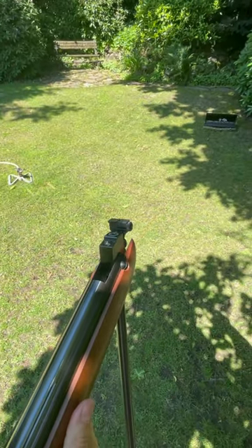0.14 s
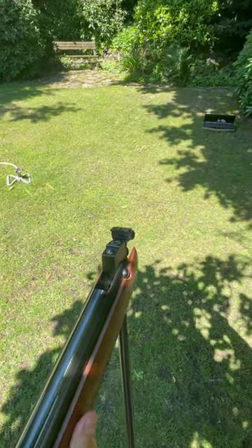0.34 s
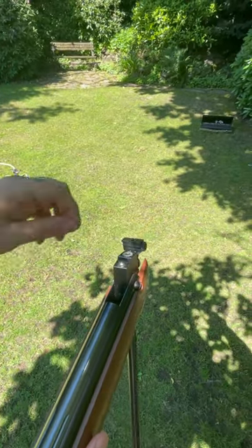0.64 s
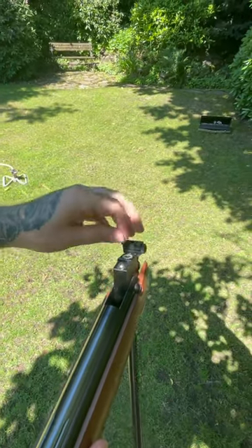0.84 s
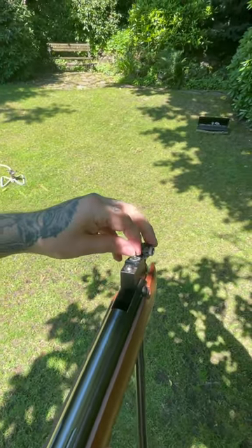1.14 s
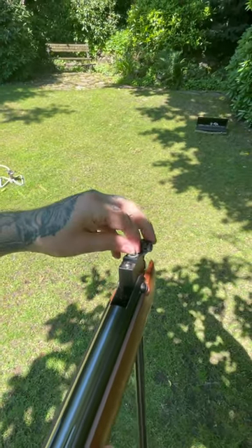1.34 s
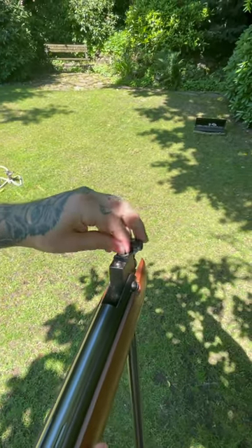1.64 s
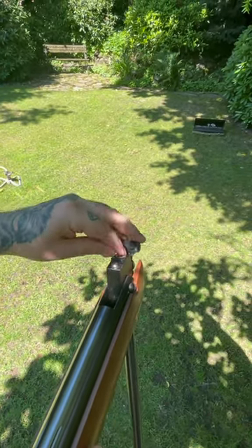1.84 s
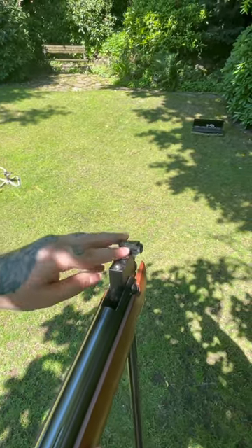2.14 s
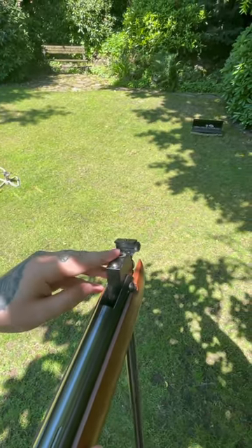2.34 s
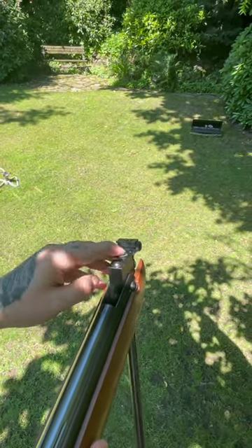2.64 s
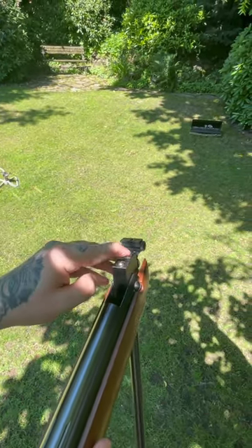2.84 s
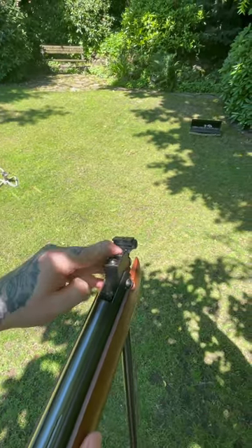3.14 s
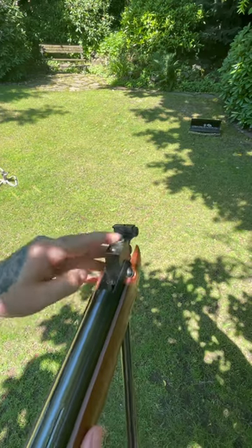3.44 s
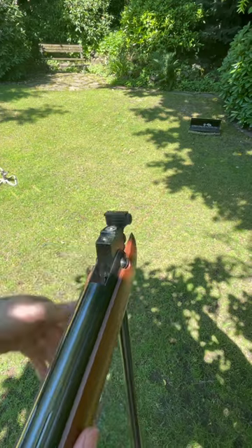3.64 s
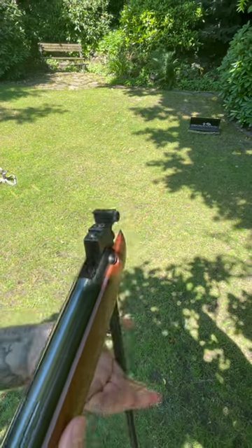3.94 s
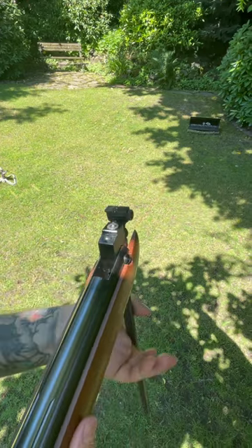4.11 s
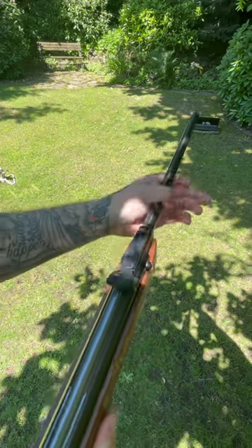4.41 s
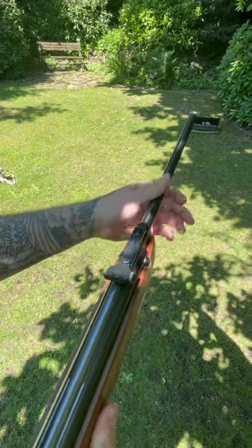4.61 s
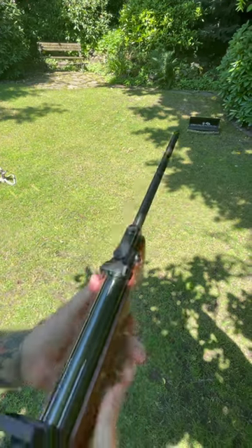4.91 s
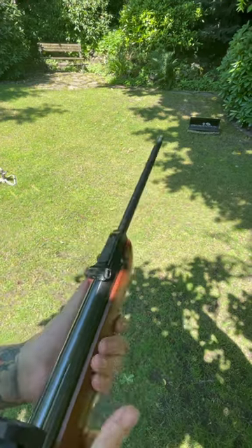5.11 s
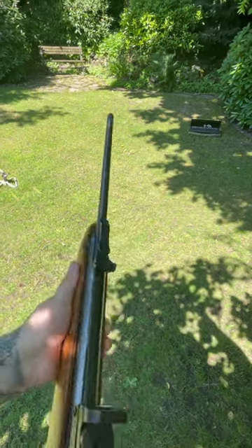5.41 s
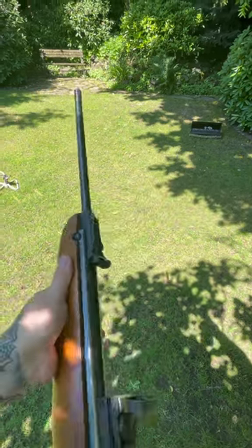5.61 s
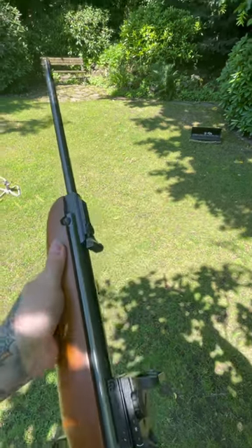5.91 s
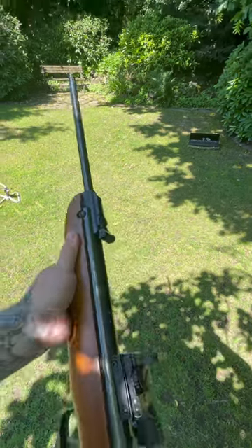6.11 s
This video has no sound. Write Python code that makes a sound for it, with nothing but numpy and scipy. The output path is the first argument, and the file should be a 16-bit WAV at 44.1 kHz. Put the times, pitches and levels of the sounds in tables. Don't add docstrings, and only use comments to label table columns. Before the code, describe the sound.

Soft birdsong and faint breeze, then a quick metal scrape, two sharp ringing cracks with a wooden thump, light handling ticks and a crisp loud click.

```python
import sys
import numpy as np
from scipy import signal
from scipy.fft import rfft, irfft, next_fast_len
from scipy.io import wavfile
from scipy.ndimage import uniform_filter1d

SR = 44100
rng = np.random.default_rng(int(sys.argv[2]) if len(sys.argv) > 2 else 0)


def wav_out(sig):
    wavfile.write(sys.argv[1], SR, np.round(np.clip(np.atleast_2d(sig).T, -1, 1) * 32767).astype(np.int16))


def magnitude_from_level(level_db):
    exponent = np.asarray(level_db, float) / 20
    return 10 ** exponent


N = 276065
T = np.arange(N) / SR

# (time [s], length [s], start [Hz], reached [Hz], level [dB])
ENGINES = [
    (.2, 0.93, 50.2, 53.3, -56.5),
    (4.02, 0.85, 71.13, 85.5, -54.5),
    (4.55, 1.14, 53.4, 67.32, -49.5),
    (4.85, 0.268, 93.2, 100.8, -59),
    (5.15, 0.54, 68.16, 87.35, -53),
]
# (time [s], level [dB])
STIR = [(0.0, 1), (.3, 0.26), (1.9, 0.05), (2.5, -1), (3.55, -3), (3.7, -0.5), (4.69, -0.5), (5.33, 3.5),
        (5.8, 3), (5.94, 5.5), (6.26, 1)]
# (frequency [Hz], level per Hz [dB])
GARDEN_TONE = [(94, -36.5), (160, -6.5), (188, -3), (284, -2.5), (479, -8.5), (892, -8.5), (1200, -12.5),
               (1430, -15.5), (3650, -25.5), (6260, -33), (7200, -28), (10400, -83), (17600, -120)]
# (time [s], held [s], level [dB], build-up per 20 dB [s])
SLEEVES = [(.25, 0.27, -90.5, 0.5), (3.95, .04, -92, -4), (4.04, .14, -83.5, -0.4), (4.34, 0.025, -81, 1.2),
           (5.47, .06, -84, -1.5), (5.6, 0.047, -89, 2), (4.79, 0.017, -72, -0.66),
           (5.09, 0.18, -70, -0.14), (5.35, 0.025, -74, 0.6), (5.551, 0.025, -84, 0.8),
           (5.891, 0.093, -73, 0.18), (6.24, 0.043, -81, -0.1)]
# (time [s], rumble [dB], eddies [dB], sink per 20 dB [s])
GUSTS = [(.04, -50.5, -53, 0.13), (.8, -62.5, -93, 3.5), (1.38, -47, -64, 0.17), (1.48, -54, -48, 0.5),
         (1.659, -45, -45, 0.03), (2.06, -51, -46, 0.15), (2.391, -72, -59, 0.5), (2.639, -52.5, -52, 0.26),
         (2.929, -60, -47, 0.6), (3.12, -60.5, -54.5, -0.02), (3.4, -48.5, -48, 0.04),
         (3.628, -47.5, -43, -0.03), (4.049, -50, -45, 0.29), (5.2, -53, -68.5, 2.5),
         (6.149, -64.5, -59.5, 2)]

# (time [s], level [dB])
FLOCK = [(0, -81), (.15, -91), (.55, -81), (.85, -79), (1.9, -74.5), (2.15, -95), (2.6, -92), (3.55, -111),
         (3.68, -81), (4.1, -77.5), (4.74, -92), (4.8, -76.5), (5.35, -62.5), (5.7, -76.5), (5.85, -64),
         (6.26, -75.5)]
# (time [s], frequency [Hz], level [dB])
CHEEP_STROKES = [
    [(0, 6067, 17.5), (.015, 6297, 10), (.05, 6143, -9.5), (.09, 6130, -14)],
    [(0, 4884, 19.5), (.015, 5293, 8.5), (.05, 5010, -8.5), (.08, 5100, -3)],
    [(0, 4705, 2), (.02, 4330, -0.5), (.06, 4300, -19.5), (.09, 4274, -37)],
    [(0, 2101, -7), (.03, 2300, -12.5), (.09, 2170, -25.5)],
]
# (time [s], two upper strokes [dB], falling stroke [dB], deep stroke [dB], pitch factor)
CHEEPS = [(.575, -80.5, -98, -60, 0.91), (0.801, -74, -73, -57.5, 0.95), (1.034, -77.5, -68.5, -64.5, 0.99),
          (1.253, -71.5, -62.5, -67, 0.97), (1.47, -81, -75, -65, 0.91), (1.548, -75, -67, -64, 0.98),
          (1.631, -75.5, -67, -59, 0.97), (1.82, -75.5, -66, -80, 0.95), (3.645, -76.5, -73, -92, 0.97),
          (3.843, -79.5, -63.5, -71, 0.95), (4.78, -75, -68, -63, 1.07), (4.83, -74.5, -73, -82, 0.95),
          (5, -69, -75, -62, 0.99), (5.089, -73, -63, -83, 1.08), (5.301, -76, -73, -77, 1.04),
          (5.525, -68.5, -77.5, -71, 0.93), (5.79, -73, -61.5, -61, 1.05), (6.04, -68.5, -61, -86, 0.96)]
# (time from peak [s], frequency [Hz], level [dB])
CHIRP_STROKES = [
    [(-.035, 4514, -24), (-.022, 4650, -8.5), (-.017, 5594, -18)],
    [(-.018, 3399, -33), (-.013, 4103, -11), (-.003, 4241, -4.5), (.001, 5000, -1), (.005, 4491, -14)],
    [(.004, 3999, -6), (.018, 3752, -7.5), (.032, 3617, -5.5)],
    [(.052, 3200, -24), (.06, 3447.5, -8), (.066, 4036, -6), (.07, 3491, -15)],
    [(.068, 3500, 1), (.085, 3257, -13), (.12, 3103, -16)],
]
# (time [s], level [dB], pitch factor)
CHIRPS = [
    (0.44, -54, 1.03),
    (1.112, -54.5, 1.013),
    (1.721, -57.5, 0.99),
    (2.295, -54.5, 1.037),
    (3.639, -57, 1.01),
    (5.351, -52, 1.01),
]
# (time [s], length [s], start [Hz], reached [Hz], level [dB])
THRUSH_LOW = [
    (1.2, 0.16, 2024, 2200, -72),
    (1.6, 0.18, 1804, 1950, -70),
    (2.07, 0.182, 1866, 1895, -71.5),
    (2.19, 0.093, 1990, 2200, -71),
]
THRUSH_HIGH = [
    (1.817, 0.22, 2550, 2887, -66),
    (1.948, 0.13, 2900, 2800, -70.5),
    (2.46, 0.084, 2960, 2775, -69),
    (2.551, 0.119, 2715, 2867, -73.5),
]
THRUSH_FAINT = [(0.57, .17, 5250, 5200, -77), (2.6, .08, 3700, 3900, -80), (2.76, 0.14, 3050, 3150, -83),
                (2.85, 0.15, 3250, 3300, -84), (3.14, .05, 4400, 4650, -87), (3.61, .03, 5500, 6250, -80),
                (3.24, .05, 2250, 2330, -80), (3.3, .08, 5450, 5600, -91), (3.37, .06, 2000, 2050, -79),
                (3.455, .13, 2370, 2410, -77), (2.76, .1, 1800, 1800, -81), (.93, .16, 2300, 2350, -78)]
TRILLS = [
    (4.54, 0.0756, 2884, 3240, -68),
    (4.68, 0.055, 2954, 3430, -65),
]
SEEPS = [
    (5.975, 0.037, 8400, 8400, -73),
    (6.022, 0.023, 4850, 5150, -50),
    (6.11, 0.081, 7700, 8550, -57.5),
]
COOS = [
    (.12, 0.11, 460, 450, -61.5),
    (.84, 0.34, 555, 546, -66),
    (1.82, 0.25, 540, 536.4, -68),
    (2.13, 0.342, 531.6, 527.5, -65),
    (3.22, 0.13, 530, 538, -66),
]

# (time [s], frequency [Hz], peak [dB], t60 [s], rise [s])
KNOCKS = [
    (1.358, 73, -17.5, 0.035, 0.0074),
    (1.362, 157, -56, 0.12, 0.0077),
    (4.041, 119.7, -29, 0.061, 0.0068),
    (4.295, 200, -31.5, 0.089, 0.0013),
    (4.3321, 203, -19, 0.13, 0.0031),
    (4.33, 125, -16, 0.023, 0.0011),
]

# (frequency [Hz], left minus right [dB], left lead [rad])
PORT_DIFFERENCE = [(440, 4, 0), (880, -3, -1.1), (1540, -3.5, -1), (2400, 3, .7), (3500, -.5, .2),
                   (5900, 2, -1.5), (7200, 5, -2.4), (9000, 1, -3.8), (15000, 0, -7.4)]
# (time [s], peak [dB], bass under 1.5 kHz [dB], left minus right [dB])
SCRAPE = [(4.2016, -35, 0, -2), (4.2035, -19, -5, -1), (4.2095, -28, 1, 4), (4.2138, -22.5, -8, -1),
          (4.2164, -20, -3, -2), (4.223, -20, 2, 2.5), (4.2245, -32.5, 0, -2), (4.23, -24.5, -4.5, 3),
          (4.2344, -23.5, 5.5, -3.5), (4.2383, -17.5, -8, 3), (4.24, -22.5, -6, 5),
          (4.2472, -14.5, -12.5, 1.5), (4.2498, -23, 0.5, 0.5), (4.258, -20.5, -10, 5),
          (4.263, -21.5, -4, 0.5), (4.264, -24.5, 1.5, -1), (4.274, -36, 14.5, -6.5)]
# (time [s], peak [dB], treble over 7 kHz [dB], bass under 1.5 kHz [dB], left minus right [dB])
TICKS = [(0.0684, -57, -1, -5, 9), (1.7397, -55, 0, -11, 6), (2.2927, -58, -8, -2, 4),
         (2.5496, -63, 1, -14, -6), (4.515, -56, -2, -13, 0), (4.5532, -47, -6, -2.5, -3),
         (4.5937, -58, 1, -18, 5), (5.043, -42.5, -12, 1.5, 1), (5.093, -39, -15, 2.5, 4),
         (5.101, -33, -14, -9, -10), (5.246, -32.5, -28, -1.5, -4), (5.2705, -33.5, -9, -13, -4),
         (5.334, -32, -21, 2.5, -1), (5.341, -33, -31, -3, 3), (5.3485, -30.5, -34, -0.5, 3),
         (5.356, -31.5, -22, -1.5, 0), (5.5675, -25.5, -13, -14, -3), (5.9676, -33, -22, 1, -3),
         (5.991, -35, 4, -42, 5)]
# (time [s], peak [dB], treble over 7 kHz [dB], bass under 1.5 kHz [dB], contact [s])
GRIP = [
    (3.9923, -45, -7, 5.5, 0.0036),
    (4.009, -48.5, -18, 4.5, 0.0076),
    (4.0193, -28.5, -4.5, -6, .0015),
    (4.023, -42.5, -15.5, 2, 0.0025),
]
LATCH = [
    (4.2912, -1.5, 5, -3, 0.0019),
    (4.2936, -7, -2, 0, 0.0024),
    (4.2985, -25.5, -10, 0.5, 0.0039),
    (4.308, -35.5, -23.5, 12.5, 0.007),
]
LOCK = [
    (4.3241, -3, -1.5, -1.5, 0.0031),
    (4.3285, -20, -6, 5.5, 0.006),
]
CATCH = [
    (5.878, -40, -27, -20, 0.0054),
    (5.881, -30, -29, -24, 0.0048),
    (5.8857, 0.5, 2.5, -5.5, 0.0022),
    (5.8895, -20.5, -10.5, 6.5, 0.0058),
    (5.894, -30, 2.5, 12, 0.00065),
    (6.0057, -17.5, 5.5, -18, 0.003),
]
# (frequency [Hz], level per Hz [dB])
SCRAPE_TONE = [(180, -80), (300, -23), (863, -2), (2210, -12), (3530, -5), (5830, -2.5), (7200, -9.5),
               (8700, -15.5), (10900, -10.5), (13700, -20.5), (16500, -36.5)]
TICK_TONE = [(300, -39), (700, -21), (1500, -10), (4300, -1.5), (6000, 5), (14000, 2), (16500, -24)]
GRIP_TONE = [(300, -18), (750, -2), (1500, 1), (2400, -4), (3400, -7), (4600, 0), (5700, -16), (7200, -16),
             (8700, -9), (11500, -21), (16500, -32)]
LATCH_TONE = [(240, -38), (440, -10), (880, 5.5), (1540, -1.5), (2400, -8.5), (3500, 0), (4600, -4),
              (5900, 2), (7200, -7.5), (9000, -11.5), (10200, -6.5), (11800, -19.5), (14500, -23),
              (16500, -34)]
LOCK_TONE = [(290, -13), (440, -3), (880, 5), (1540, 5), (2200, -10), (2700, 0), (3500, -1), (4800, -4),
             (7000, -2.5), (8800, -9), (10200, -11.5), (11800, -16.5), (14500, -16.5), (16500, -39.5)]
CATCH_TONE = [(350, -48), (800, -43), (1200, 4.5), (2000, -11), (3500, 0.5), (4600, -5), (5300, -6.5),
              (6400, 1.5), (7300, -8.5), (8600, 1.5), (9700, -6), (10900, -4.5), (12000, -7), (14500, -17),
              (16500, -27)]
# (frequency [Hz], level [dB], t60 [s])
SCRAPE_MODES = [(843, 0, 0.096), (1840, -5, 0.057), (2430, -11.5, 0.075), (3800, 2, 0.047),
                (4850, -5, 0.038), (5660, -12, 0.019), (6400, -3, .03), (11330, -16.5, .02)]
TICK_MODES = [(810, -10.5, .027), (1425, -1, 0.032), (1940, -1.5, 0.063), (2426, -1, 0.048),
              (4474, -4, 0.026), (5450, -0.5, 0.046)]
LATCH_MODES = [(789, -1.5, 0.04), (1680, -8.5, 0.021), (2640, -13.5, 0.055), (4020, -3.5, 0.023),
               (4520, -18.5, 0.018), (5860, -27.5, 0.081), (10450, -25.5, 0.05)]
LOCK_MODES = [(780, -16, 0.04), (1770, -1, 0.04), (2800, -6, 0.061), (3900, -17.5, 0.041), (5200, -20, .08),
              (6550, -22.5, .08)]
CATCH_MODES = [(1267, 0, 0.067), (2200, -13, 0.077), (3320, -4, 0.052), (4760, -2, 0.044),
               (6000, -14, 0.076), (7700, -31, 0.027)]


def unit(x):
    return x / np.sqrt(np.mean(x ** 2))


def opposed(db):
    return magnitude_from_level(np.array([[db], [-db]]) / 2)


def decay(t, t60):
    return np.exp(-np.log(1000) * t / t60)


def colour(x, points):
    n = next_fast_len(x.shape[-1])
    hz = np.arange(n // 2 + 1) * SR / n
    f, db = np.transpose(points)
    gain = magnitude_from_level(np.interp(np.log(hz + 1), np.log(f), db))
    return irfft(rfft(x, n) * gain, n)[..., :x.shape[-1]]


def band(x, lo_hz, hi_hz, order=2):
    sos = signal.butter(order, [lo_hz, hi_hz], "bandpass", fs=SR, output="sos")
    return signal.sosfilt(sos, x)


def walk(rate_hz):
    k = int(SR / rate_hz)
    held = np.repeat(rng.standard_normal(N // k + 1), k)
    return unit(uniform_filter1d(uniform_filter1d(held, k), k)[:N])


def swells(s, held_s, db, rise_s, fall_s, floor_db):
    rise_s, fall_s = np.maximum(rise_s, .005), np.maximum(fall_s, .005)
    s, held_s, db, rise_s, fall_s = (np.reshape(v, (-1, 1)) for v in (s, held_s, db, rise_s, fall_s))
    t = T[::64]
    before = (s - t) / rise_s
    after = (t - s - held_s) / fall_s
    down_db = 20 * np.maximum(np.maximum(before, after), 0)
    power = np.sum(magnitude_from_level(db - down_db) ** 2, axis=0) + magnitude_from_level(floor_db) ** 2
    return np.interp(T, t, np.sqrt(power))


def hedges(x, t60_s, wet_db, gap_s):
    t = np.arange(SR // 2) / SR
    echo = rng.standard_normal((2, len(t))) * decay(t, t60_s) * (1 - np.exp(-t / gap_s))
    echo = echo / np.sqrt(np.sum(echo ** 2) / 2)
    return magnitude_from_level(wet_db) * signal.fftconvolve(np.atleast_2d(x), echo, axes=1)[:, :N]


def glides(rows, turn, sag, start_db, end_db):
    turn = np.clip(turn, .05, .95)
    return [[(s, hz0, db + start_db), (s + turn * length, hz, db), (s + length, hz * sag, db + end_db)]
            for s, length, hz0, hz, db in rows]


def repeat(template, calls):
    return [[(s0 + s, hz * k, dbs[j % len(dbs)] + db) for s, hz, db in stroke]
            for s0, *dbs, k in calls for j, stroke in enumerate(template)]


def whistle(strokes, rough=0., rough_hz=200., fade_s=.006):
    out = np.zeros(N)
    flutter = np.exp(rough * (.3 * walk(rough_hz) + 1j * walk(rough_hz)))
    for stroke in strokes:
        s, hz, db = np.transpose(stroke)
        i = slice(int(s[0] * SR), int(s[-1] * SR))
        t = T[i]
        fade = min(fade_s, (s[-1] - s[0]) / 4)
        edge = np.minimum(np.minimum(t - s[0], s[-1] - t) / fade, 1)
        phase = 2 * np.pi * np.cumsum(np.interp(t, s, hz)) / SR
        tone = np.imag(flutter[i] * np.exp(1j * phase))
        out[i] += np.sqrt(2) * edge * magnitude_from_level(np.interp(t, s, db)) * tone
    return out


def traffic():
    strokes = glides(ENGINES, turn=0.81, sag=1.25, start_db=-0.5, end_db=-20)
    return whistle(strokes, rough=0.43, rough_hz=18, fade_s=0.12)


def wide_noise(side):
    return rng.standard_normal(N) + side * rng.standard_normal(N) * np.array([[1], [-1]])


def wavering(x, edges_hz, ratio, waver_db, waver_hz):
    out = 0
    for hz in edges_hz:
        part = band(np.roll(x, 9 * hz, axis=1), hz, ratio * hz)
        out = out + magnitude_from_level(waver_db * walk(waver_hz)) * part
    return out


def level(x, gain):
    return x / np.std(x.mean(axis=0)) * gain


def hum():
    x = wavering(colour(wide_noise(1.01), GARDEN_TONE), (120, 240, 480, 960), 2, 2.0, 8.4)
    return level(x, magnitude_from_level(-66.5 + 0.69 * np.interp(T, *np.transpose(STIR))))


def leaves():
    x = wavering(colour(wide_noise(1.4), GARDEN_TONE), (2000, 2700, 3484, 4900), 1.35, 2.6, 9.9)
    return level(x, magnitude_from_level(-75.5 + 1.84 * np.interp(T, *np.transpose(STIR))))


def sleeves():
    x = sum(magnitude_from_level(3 * walk(18)) * band(wide_noise(.5), hz, 1.19 * hz, order=4) for hz in (9200, 10900, 12900))
    return level(x, swells(*np.transpose(SLEEVES), fall_s=0.04, floor_db=-93.5))


def port_hiss():
    hiss = unit(band(rng.standard_normal(N), 6800, 10800))
    return hiss * magnitude_from_level(-92.5) * np.array([[1], [-1]])


def breeze():
    carrier = np.exp(2j * np.pi * 62.2 * T)
    core = unit(np.real(carrier * (walk(40) + 1j * walk(40))))
    skirt = unit(band(rng.standard_normal(N), 35, 110))
    eddies = unit(band(rng.standard_normal(N), 33, 90))
    s, rumble_db, eddy_db, sink_s = np.transpose(GUSTS)
    rumble_gain = swells(s, 0, rumble_db, sink_s, sink_s, floor_db=-72)
    rumble = (core + magnitude_from_level(-2.0) * skirt) * rumble_gain * magnitude_from_level(2.2 * walk(9.8))
    wide_s = 1.1 * sink_s
    eddies = eddies * swells(s, 0, eddy_db, wide_s, wide_s, floor_db=-72.5) * magnitude_from_level(1.7 * walk(12))
    return rumble + eddies * np.array([[1], [-1]])


def pigeon():
    strokes = glides(COOS, turn=.6, sag=.985, start_db=-2, end_db=-7)
    coo = whistle(strokes, rough=.8, rough_hz=40, fade_s=.03)
    return coo * magnitude_from_level(-5) + hedges(coo, t60_s=.3, wet_db=-5, gap_s=.012)


def thrush():
    strokes = glides(THRUSH_LOW + THRUSH_HIGH + THRUSH_FAINT, turn=.48, sag=.97, start_db=-1, end_db=-10)
    song = whistle(strokes, rough=.9, rough_hz=200, fade_s=.02)
    return song * magnitude_from_level(-1) + hedges(song, t60_s=0.67, wet_db=1.2, gap_s=0.0059)


def flock():
    lo_hz, hi_hz, note_s = 4000, 6450, .04
    s, pitch, glide, size = rng.random((4, 400))
    hz = lo_hz + (hi_hz - lo_hz) * pitch
    start_hz = hz * (0.86 + 0.23 * glide)
    rows = np.transpose([s * (T[-1] - note_s), np.full(400, note_s), start_hz, hz, -10 * size])
    strokes = glides(rows, turn=.3, sag=.97, start_db=-3, end_db=-8)
    crowd = whistle(strokes, rough=1.2, rough_hz=400, fade_s=.01)
    return unit(crowd) * magnitude_from_level(np.interp(T, *np.transpose(FLOCK)))


def far_sparrows():
    calls = [(s, up_db, up_db - 0.5, fall_db, deep_db, k) for s, up_db, fall_db, deep_db, k in CHEEPS]
    cheeps = whistle(repeat(CHEEP_STROKES, calls), rough=1.4, rough_hz=380, fade_s=.012)
    strokes = glides(TRILLS, turn=.45, sag=.995, start_db=3, end_db=-12)
    trills = whistle(strokes, rough=1.6, rough_hz=890, fade_s=0.01)
    far = cheeps + trills + flock()
    return far * magnitude_from_level(-9) + hedges(far, t60_s=.38, wet_db=1.5, gap_s=.01)


def near_sparrow():
    chirps = whistle(repeat(CHIRP_STROKES, CHIRPS), rough=.85, rough_hz=400, fade_s=.004)
    strokes = glides(SEEPS, turn=0.28, sag=0.89, start_db=1.0, end_db=-7.0)
    seeps = whistle(strokes, rough=1.3, rough_hz=300, fade_s=0.0046)
    out = chirps * magnitude_from_level(np.array([[2], [-3]])) + hedges(chirps, t60_s=.45, wet_db=0, gap_s=.015)
    return out + seeps * opposed(3) + hedges(seeps, t60_s=.3, wet_db=-15, gap_s=.01)


def stock():
    out, t = np.zeros(N), T[:SR // 4]
    for s, hz, db, t60_s, rise_s in KNOCKS:
        i = int(s * SR)
        swell = 1 - np.exp(-(t / rise_s) ** 2)
        out[i:i + len(t)] += magnitude_from_level(db) * swell * decay(t, t60_s) * np.sin(2 * np.pi * hz * t)
    return out


def ports(x):
    hz = np.arange(x.shape[-1] // 2 + 1) * SR / x.shape[-1]
    f, db, rad = np.transpose(PORT_DIFFERENCE)
    half = np.sqrt(magnitude_from_level(np.interp(hz, f, db))) * np.exp(.5j * np.interp(hz, f, rad))
    return irfft(rfft(x) * np.array([half, 1 / half]), x.shape[-1])


def contact_force(t, contact_s):
    touch = 1.6 * np.exp(-t / 0.00049)
    press = 1.4 * np.exp(-(t / max(contact_s, 2e-4)) ** 2)
    settle = 0.13 * np.exp(-t / (1.9 * contact_s))
    return (touch + press + settle) * np.minimum(t / 0.00039, 1)


def metal(blows, tone, modes, ring_db, apart, wander=.01):
    size, lead = 4096, 256
    out = np.zeros((2, N + size))
    t = np.arange(size - lead) / SR
    hz, mode_db, t60_s = np.transpose(modes)[:, :, None]
    for s, db, treble_db, bass_db, contact_s, pan_db in blows:
        bent_hz = hz * (1 + wander * rng.standard_normal(hz.shape))
        ring = np.sum(magnitude_from_level(mode_db) * np.sin(2 * np.pi * bent_hz * t) * decay(t, t60_s), axis=0)
        grit = rng.standard_normal((3, len(t))) * contact_force(t, contact_s)
        push = grit[0] + apart * signal.lfilter([1, -1], [1, -.92], grit[1:])
        push = np.pad(push, ((0, 0), (lead, 0)))
        spectrum = uniform_filter1d(np.abs(rfft(push.mean(axis=0))), size=45)
        push = irfft(rfft(push) / spectrum, size)
        crack = colour(push, tone)
        rung = signal.fftconvolve(push, ring[None], axes=1)[:, :size]
        blow = crack / np.abs(crack).max() + magnitude_from_level(ring_db) * rung / np.abs(rung).max()
        blow = ports(colour(blow, [(1000, bass_db), (2000, 0), (6000, 0), (8000, treble_db)]))
        blow[:, :lead] *= np.exp(np.arange(-lead, 0) / 10)
        i = int(s * SR) - lead
        out[:, i:i + size] += magnitude_from_level(db) * opposed(pan_db) * blow
    return out[:, :N]


def panned(blows, pan_db):
    return [(*blow, pan_db) for blow in blows]


def barrel_scrape():
    treble_db, contact_s = 0.5, 0.0028
    blows = [(s, db, treble_db, bass_db, contact_s, pan_db) for s, db, bass_db, pan_db in SCRAPE]
    return metal(blows, SCRAPE_TONE, SCRAPE_MODES, ring_db=-13, apart=.4, wander=.06)


def handling_ticks():
    blows = [(s, db, treble_db, bass_db, 0.0066 * magnitude_from_level(4.3 * bass_db), pan_db)
             for s, db, treble_db, bass_db, pan_db in TICKS]
    return metal(blows, TICK_TONE, TICK_MODES, ring_db=-23.5, apart=0.62)


def rifle():
    near = handling_ticks() + barrel_scrape()
    near = near + metal(panned(GRIP, 0), GRIP_TONE, TICK_MODES, ring_db=-20, apart=0.54)
    near = near + metal(panned(LATCH, 0.5), LATCH_TONE, LATCH_MODES, ring_db=-12, apart=.3)
    near = near + metal(panned(LOCK, 4.8), LOCK_TONE, LOCK_MODES, ring_db=-24, apart=.3)
    near = near + metal(panned(CATCH, 1), CATCH_TONE, CATCH_MODES, ring_db=-23, apart=.3)
    return near + hedges(band(near[0], 400, 6500, order=1), t60_s=0.29, wet_db=-23.5, gap_s=0.0015)


def scene():
    background = traffic() + hum() + leaves() + sleeves() + port_hiss() + breeze()
    birds = pigeon() + thrush() + far_sparrows() + near_sparrow()
    return background + birds + stock() + rifle()


def band_limit(x):
    return signal.sosfilt(signal.butter(12, 17000, fs=SR, output="sos"), x)


def record(dry):
    cut = signal.sosfilt(signal.butter(2, 32, "highpass", fs=SR, output="sos"), dry)
    rounded = .9 * np.tanh(cut / .9)
    mix = signal.sosfilt(signal.ellip(8, .2, 70, 16200, fs=SR, output="sos"), rounded)
    return band_limit(mix)


dry = scene()
out = record(dry)
wav_out(out)
```